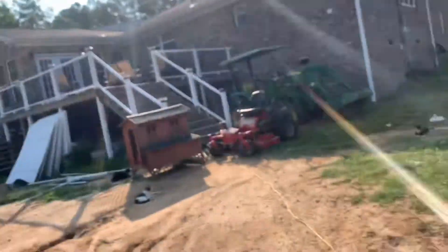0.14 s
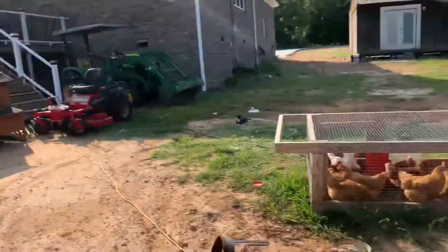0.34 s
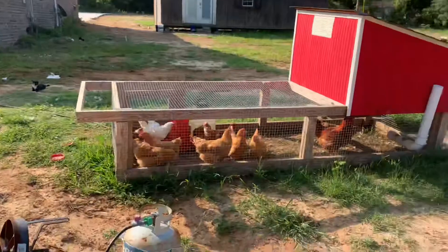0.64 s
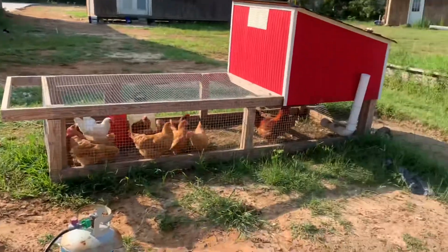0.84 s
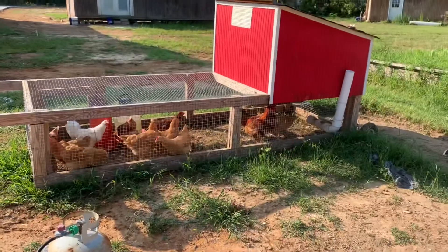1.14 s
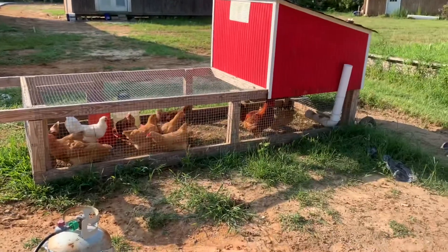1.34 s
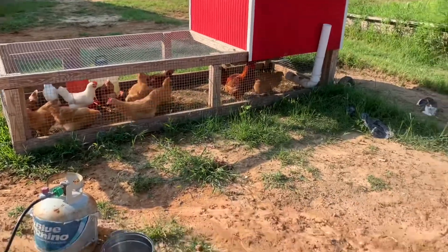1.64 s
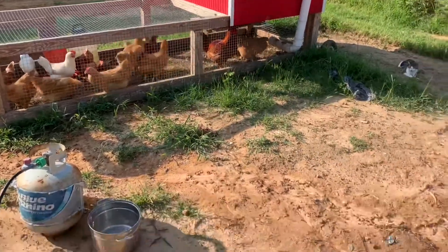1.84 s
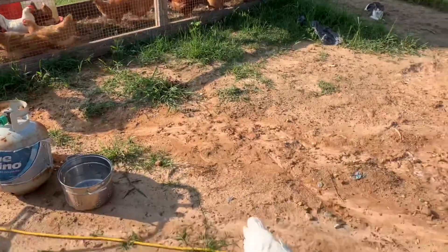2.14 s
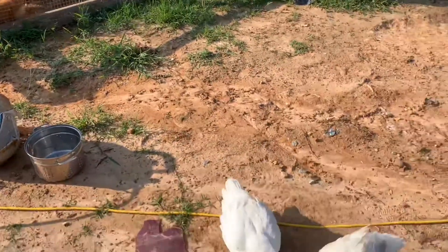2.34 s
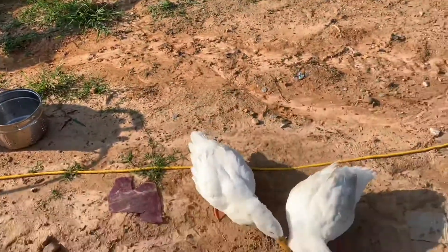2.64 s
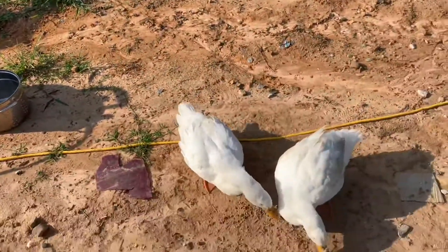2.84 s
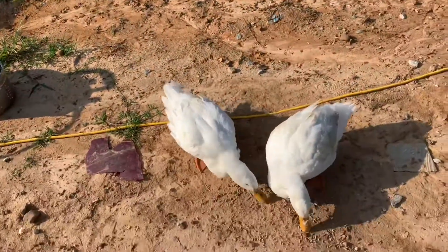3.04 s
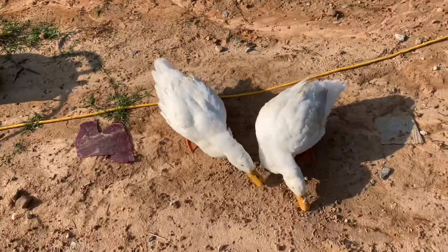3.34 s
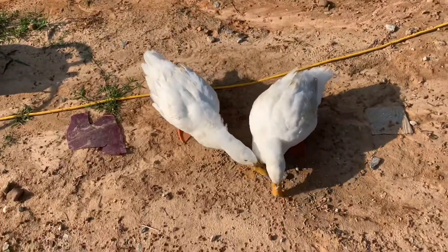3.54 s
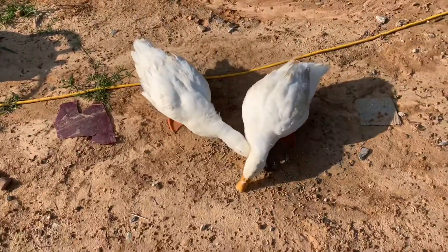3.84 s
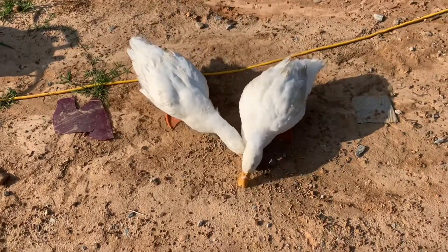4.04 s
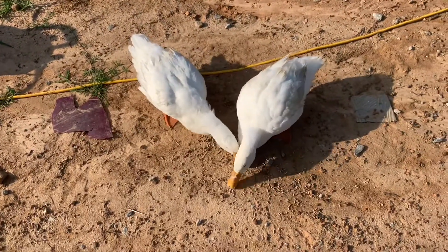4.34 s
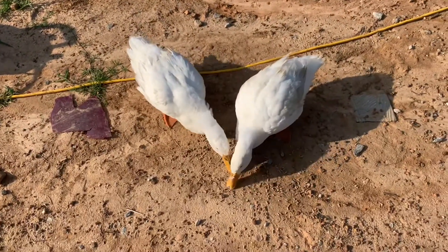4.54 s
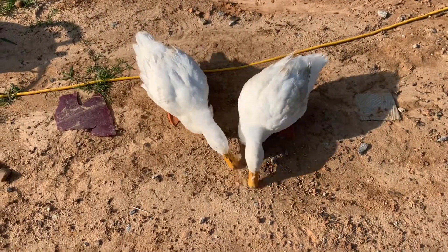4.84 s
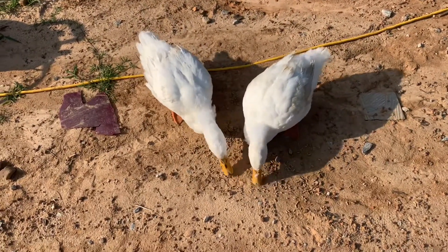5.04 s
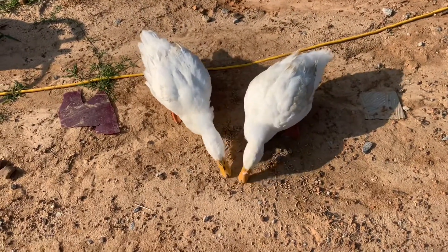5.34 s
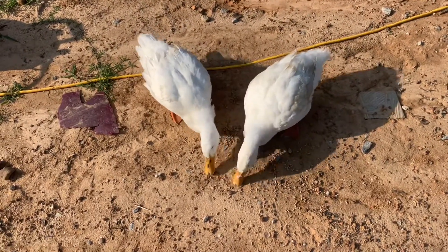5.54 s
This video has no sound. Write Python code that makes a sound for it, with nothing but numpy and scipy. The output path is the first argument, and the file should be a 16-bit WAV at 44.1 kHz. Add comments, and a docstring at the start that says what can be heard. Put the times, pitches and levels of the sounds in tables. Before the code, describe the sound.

Close, clumsy fingers rub and bump the camera body at the start, over a low wavering hum, open air and shrill insects. The yard then settles, with tiny wet-sounding woody ticks of duck bills, light rubs and soft taps. A rough rasp with thuds comes after three seconds, then one deep sharp knock at four and busy nibbling clicks to the end.

```python
"""A farmyard heard through a hand-held camera, under a low hum, rumble, open air, insects and a cricket.
Filtered noise bursts with short bent tones make the ducks' faint bill clicks in the dirt.
Stick-slip jerks over hiss make the rasp of fingers on the camera and the scuff of one shoe.
Taps and deep thumps are single pushes through resonances, with the low notes delayed
so that each blow sweeps down in pitch."""
import sys
import numpy as np
from scipy import signal
from scipy.fft import rfft, irfft, next_fast_len
from scipy.io import wavfile
from scipy.ndimage import uniform_filter1d, map_coordinates

SR = 44100
rng = np.random.default_rng(int(sys.argv[2]) if len(sys.argv) > 2 else 0)


def bounce(signal):
    """Save signal as a 16-bit WAV file at the path given by the first command-line argument."""
    frames = np.transpose(np.atleast_2d(signal))
    limited = np.clip(frames, -1, 1)
    pcm = np.round(limited * 32767).astype(np.int16)
    wavfile.write(sys.argv[1], SR, pcm)


N = 250429

# level of the hum, which the rumble partly follows: (t/s, level/dB)
HUM_LEVEL = [(0, -50), (.4, -48.5), (.9, -51.5), (1.1, -62), (1.75, -55), (1.95, -46.5), (2.2, -45.5),
             (2.45, -50), (2.72, -47.5), (2.85, -59), (3.6, -49.5), (4.9, -52.5), (5.25, -55), (5.68, -54)]
# colour of the yard rumble and of the shaken case: (f/Hz, relative density/dB per Hz)
RUMBLE_COLOUR = [(18, -42.5), (30, -40), (43, 1), (59, 0.5), (73, 8), (87, -4.5), (119, 3.5), (343, -15),
                 (500, -20.5), (650, -40), (1100, -120)]
# side colour of skin rasp, for the second and light grips and the slips: (f/Hz, relative density/dB per Hz)
SKIN_SIDE_COLOUR = [(210, -72), (350, -50), (404, -17.5), (512, -12.5), (584, -18), (723, -2.5), (962, -8),
                    (1210, -8.5), (1410, -19.5), (2080, -18.5), (2430, -22.5), (2900, -21), (6000, -46),
                    (7800, -81), (13200, -120)]


def amp(db):
    """Decibels to linear gain."""
    return 10 ** (np.asarray(db) / 20)


def unit(x):
    """x scaled to rms 1."""
    return x / np.sqrt(np.mean(x ** 2) + 1e-20)


def along(points, hz):
    """Values read between (f/Hz, value) points on a log frequency axis."""
    f, v = np.transpose(points)
    return np.interp(np.log(hz + 1), np.log(f + 1), v)


def curves(rows):
    """One value per sample for each column after the time."""
    s, *cols = np.transpose(rows)
    return [np.interp(np.arange(N) / SR, s, c) for c in cols]


def wobble(rate):
    """A smooth random curve, rate knots a second."""
    knots = rng.standard_normal(int(N * rate / SR) + 4)
    return map_coordinates(knots, [np.arange(N) * rate / SR])


def filtered(x, response):
    """x times a complex response of frequency."""
    n = x.shape[-1]
    m = next_fast_len(n + SR // 4)
    return irfft(rfft(x, m) * response(np.fft.rfftfreq(m, 1 / SR)), m)[..., :n]


def coloured(x, spectrum):
    """x shaped by a spectrum, at rms 1."""
    return unit(filtered(x, lambda hz: amp(along(spectrum, hz))))


def noise(spectrum):
    """Steady noise of a given colour, at rms 1."""
    return coloured(rng.standard_normal(N), spectrum)


def resonance(hz, centre, width):
    """Response of one damped resonance, with gain 1 at its centre."""
    return 1j * hz * width / (centre ** 2 - hz ** 2 + 1j * hz * width)


def stereo(mid, side):
    """Left and right from mid and side."""
    return np.array([mid + side, mid - side])


def add(track, s, sound):
    """Mix a sound in at time s."""
    part = track[..., max(round(s * SR), 0):][..., :sound.shape[-1]]
    part += sound[..., :part.shape[-1]]


def patchy(x, depth_db, hz_size, time_size):
    """x with random patches of gain, so that each band swells and fades on its own."""
    z = signal.stft(x, nperseg=512)[2]
    field = rng.standard_normal(z.shape[-2:])
    field = uniform_filter1d(field, hz_size, 0)
    field = uniform_filter1d(field, time_size, 1)
    gain = unit(amp(depth_db * unit(field)))
    return signal.istft(z * gain, nperseg=512)[1][..., :N]


def dispersion(hz, lag=0.00854, power=0.3427):
    """Low notes arrive late (lag seconds at 100 Hz), so every jerk or blow sweeps downward."""
    return np.exp(-2j * np.pi * lag * 100 * (hz / 100) ** power / power)


def sweep(hz, delay):
    """A rolling fingertip sounds its lower notes later than its top."""
    half_hz = 790  # the delay has halved here
    return np.exp(-2j * np.pi * delay * half_hz * np.arctan(hz / half_hz))


def friction(rate, spread_db, smooth):
    """Stick and slip: random tiny jerks (rate a second) of uneven size over a smooth hiss."""
    slipping = rng.random(N) < rate / SR
    direction = rng.choice([-1, 1], N)
    size = amp(spread_db * rng.standard_normal(N).clip(-2, 2))
    jerks = unit(slipping * direction * size)
    return filtered(jerks + smooth * rng.standard_normal(N), dispersion)


def gesture(s, length, swell_db, attack, t60):
    """Gain of one sliding motion: attack, a hold that swells or sags, release."""
    t = np.arange(N) / SR - s
    onset = np.sin(np.pi / 2 * np.clip(t / attack, 0, 1))
    hold = amp(swell_db * (np.clip(t / length, 0, 1) - 0.5))
    release = np.exp(-np.log(1000) * np.maximum(t - length, 0) / t60)
    return onset * hold * release


def hum(hum_hz=60):
    """A low sine wavers in level and pitch."""
    level_db, = curves(HUM_LEVEL)
    waver_db = 1.2 * wobble(6)
    pitch_hz = hum_hz + 1.15 * wobble(12.0)
    return amp(level_db + waver_db) * np.sin(2 * np.pi * np.cumsum(pitch_hz) / SR)


def rumble(base_db=-52.5, follows_hum=0.25):
    """Low noise drifts in level and partly swells with the hum."""
    hum_db, = curves(HUM_LEVEL)
    swell_db = follows_hum * (hum_db - hum_db.mean())
    return amp(base_db + swell_db + 0.46 * wobble(0.97)) * noise(RUMBLE_COLOUR)


def open_air(base_db=-62, drift_db=-0.96, flutter_db=0.15):
    """Wide soft noise whose bands swell and fade on their own."""
    # colour of the open air, mid then side: (f/Hz, relative density/dB per Hz)
    mid_colour = [(180, 6.5), (300, -3), (389, -9), (432, -5), (760, -7), (900, -9), (1100, -11.5),
                  (1340, -15), (1770, -5), (2380, -22.5), (3310, -14.5), (3860, -11), (5000, -24),
                  (6500, -50.5), (11000, -120)]
    side_colour = [(240, -50.5), (400, -23), (567, -18.5), (723, -10.5), (1020, -1.5), (1380, -6),
                   (1870, -3.5), (2620, -7.5), (4130, -5), (5000, -5.5), (6500, -14), (11000, -120)]
    level_db = base_db + drift_db * wobble(2.1) + flutter_db * wobble(19.0)
    air = amp(level_db) * stereo(noise(mid_colour), amp(-2.0) * noise(side_colour))
    return patchy(air, depth_db=3.0, hz_size=5, time_size=8)


def insect_chorus(mid_db=-66.0, side_db=-63.5, swell_db=0.6):
    """Many far insects merge into a fairly even band of high noise."""
    # colour of the far insects, mid then side: (f/Hz, relative density/dB per Hz)
    mid_colour = [(4000, -38), (5200, -15.5), (6000, 4.5), (6800, 6.5), (7700, 8.5), (8200, -3.5),
                  (8550, 1.5), (9200, -2), (9900, -39), (11500, -12.5), (13200, -13), (14300, -28)]
    side_colour = [(3500, -48), (4700, -15), (6000, -5), (7300, -4), (8200, -4), (8600, -6), (9300, -6),
                   (10500, -26.5), (12000, -39), (14300, -24)]
    pair = stereo(amp(mid_db) * noise(mid_colour), amp(side_db) * noise(side_colour))
    return patchy(amp(swell_db * wobble(5.02)) * pair, depth_db=0.8, hz_size=2, time_size=60)


def whine(whine_hz=8500, level_db=-81):
    """A thin sine of steady level and slightly unsteady pitch sits among the insects."""
    pitch_hz = whine_hz + 18 * wobble(55)
    return amp(level_db) * np.sin(2 * np.pi * np.cumsum(pitch_hz) / SR)


def cricket(stroke_gap_s=0.0148, rest_s=0.007, triple_share=0.28, stroke_s=0.002,
            glide_hz=110, scatter_hz=35, scatter_db=2.3):
    """Wing strokes come in twos and threes with a short rest between; each is a falling whistle."""
    # song of the cricket: (t/s, level/dB, phase between left and right/rad, f/Hz)
    song = [(0, -65.5, 1.16, 7720), (1.6, -59, 1.97, 7690), (2.6, -59.5, 1.9, 7770), (3.2, -69, 0.87, 7810),
            (4.1, -68.5, 0.84, 7800), (4.5, -64.5, .5, 7840), (5.68, -65, 0.55, 7820)]
    db, port_phase, song_hz = curves(song)
    groups = [[stroke_gap_s + rest_s] + [stroke_gap_s] * (1 + int(u < triple_share))
              for u in rng.random(size=240)]
    gaps = np.concatenate(groups)
    late, loud, sharp = rng.standard_normal((len(gaps), 3)).T
    times = np.cumsum(gaps * (1 + 0.035 * late))
    t = np.arange(N) / SR
    nearest = np.searchsorted((times[1:] + times[:-1]) / 2, t)
    u = (t - times[nearest]) / stroke_s  # position within the nearest stroke
    pitch_hz = song_hz + scatter_hz * sharp[nearest] - glide_hz * u.clip(-2, 2) + 60 * wobble(400)
    phase = 2 * np.pi * np.cumsum(pitch_hz) / SR
    strokes = unit(amp(scatter_db * loud[nearest]) * np.exp(-0.5 * u ** 2))
    loudness = amp(db + 0.3 * wobble(5)) * strokes
    return loudness * np.sin(phase + np.array([port_phase, -port_phase]) / 2)


def scuff():
    """A sole slides over dry grit: dense uneven jerks, separate left and right, fading as it slows."""
    # colour of the grit: (f/Hz, relative density/dB per Hz)
    grit_colour = [(180, -49), (300, -10), (382, -5), (414, -2.5), (950, -2.5), (1820, -6.5), (2470, -17),
                   (7360, -22.5), (8920, -25), (9830, -49), (11400, -25), (14000, -42)]
    grit = np.array([coloured(friction(rate=2900, spread_db=15, smooth=1.0), grit_colour)
                     for _ in range(2)])
    return amp(-42.5) * gesture(0.653, length=0.11, swell_db=-8, attack=0.03, t60=0.32) * grit


def ticks(tick_hz=12000, width_hz=1500, t60=0.021):
    """Now and then a tiny, very high tick: narrow-band noise that dies at once."""
    # very high ticks: (t/s, level before decay/dB)
    tick_times = [(1.268, -60), (2.574, -66), (3.873, -70), (4.707, -61)]
    out, t = np.zeros((2, N)), np.arange(SR // 32) / SR
    for s, db in tick_times:
        burst = rng.standard_normal((2, len(t)))
        ring = filtered(burst, lambda hz: resonance(hz, tick_hz, width_hz) ** 2)
        add(out, s, amp(db - 60 * t / t60) * unit(ring))
    return out


def bills(click_t60=0.059, nibble_db=-55.0, nibble_spread_db=3, nibble_s=0.022, overtone_db=-16,
          overtone_spread_db=6.0, tone_share=0.5, tone_rise_s=0.00096, bend_hz_per_s=6000):
    """Bills snap in the dirt, clear clicks among quick faint nibbles, each ringing at the pitch of its gape."""
    # the clearest bill clicks: (t/s, level before the common 8 dB cut/dB, f/Hz)
    clear_clicks = [(1.0138, -42.5, 1790), (1.029, -48, 1740), (1.0812, -39.5, 1790), (1.1136, -52, 1990),
                    (1.1336, -46, 1690), (1.2558, -47, 1720), (1.312, -43, 1870), (1.332, -43.5, 1670),
                    (1.9093, -41.5, 2120), (2.5733, -41.5, 1645), (2.61, -46, 1590), (2.93, -48, 1920),
                    (3.9103, -42, 1640), (3.936, -44.5, 1850), (4.04, -34.5, 1658), (4.057, -45, 1780),
                    (4.3313, -40, 1685), (4.3905, -37.5, 1764), (4.5286, -35.5, 1770), (4.552, -49, 1770),
                    (4.568, -50, 1900), (4.6097, -43, 1710), (4.678, -49, 1750), (4.706, -44.5, 1790),
                    (4.826, -69, 1750), (5.0262, -50, 1800), (5.138, -45, 1700), (5.1554, -39, 1734),
                    (5.157, -49, 2350), (5.159, -44, 1130), (5.171, -42, 1803), (5.1943, -51, 1790),
                    (5.2343, -45.5, 1760), (5.485, -49, 1877), (5.61, -49, 1810)]
    # lower and upper resonance of the bill: (f/Hz, width/Hz)
    lower, upper = [(1800, 290), (3880, 340)]
    # runs of nibbles; a run that ends before it starts is silent: (start/s, end/s)
    runs = [(0.95, 1.6), (3.65, 4.9), (4.378, 3.9), (5.02, 5.54)]
    out, t = np.zeros((2, N)), np.arange(SR // 16) / SR
    beats = np.concatenate([np.arange(start, end, nibble_s) for start, end in runs])
    chances = rng.standard_normal((len(beats), 3))
    nibbles = [(s + nibble_s * late / 2, nibble_db + nibble_spread_db * loud, lower[0] * np.exp(0.074 * sharp))
               for s, (late, loud, sharp) in zip(beats, chances)]
    decay = amp(-60 * t / click_t60)
    for s, db, pitch_hz in list(clear_clicks) + nibbles:
        snap = rng.standard_normal((2, len(t))) * decay
        gape = lower[0] / pitch_hz  # a wider gape rings lower
        overtone = amp(overtone_db + overtone_spread_db * rng.standard_normal())

        def cavity(hz):
            return resonance(hz * gape, *lower) ** 2 + overtone * resonance(hz * gape, *upper) ** 2

        bend = bend_hz_per_s * rng.standard_normal()
        whistle = np.sin(2 * np.pi * (pitch_hz + bend * t / 2) * t)
        tone = whistle * decay * (1 - np.exp(-t / tone_rise_s))
        click = unit(filtered(snap, cavity)) + tone_share * unit(tone)
        add(out, s - 0.001, amp(db - 8.0) * click / np.abs(click).max())
    return out


def slips():
    """A fingertip lets go suddenly, rasps for a moment and sticks again."""
    # brief finger slips: (t/s, level before the common 5.5 dB cut/dB, length scale/s)
    slip_times = [(0.615, -48, 0.014), (3.014, -49, 0.021), (3.048, -40, 0.045), (3.554, -61, 0.013),
                  (3.621, -39.5, 0.015), (4.243, -46, 0.062), (4.278, -47, 0.0081), (4.322, -43.5, 0.019),
                  (4.617, -44, 0.01), (4.839, -46.5, 0.014), (5.347, -43, 0.0086), (5.649, -48.5, 0.0085)]
    # colour of the skin: (f/Hz, relative density/dB per Hz)
    skin = [(150, 8.5), (420, 19), (650, 13.0), (900, 12.5), (1400, -17.5), (2200, -13.0), (4000, -59.0)]
    touch, t = np.zeros(N), np.arange(SR // 8) / SR
    for s, db, length in slip_times:
        rise = 1 - np.exp(-t / 0.0033)
        fall = np.exp(-0.25 * (t / length) ** 2)
        add(touch, s, amp(db - 5.5) * rise * fall)
    mid = coloured(friction(rate=600, spread_db=-3.5, smooth=0.6), skin)
    side = coloured(friction(rate=900, spread_db=-12, smooth=0.48), SKIN_SIDE_COLOUR)
    return touch * stereo(mid, amp(-10.5) * side)


def gap_rings(band_rate=45, waver_hz=14, port_phase=1.0):
    """The rasp rings the air gap under the finger: narrow noise that glides as the gap changes."""
    # rings of the gap: (t/s, length/s, start f/Hz, end f/Hz, left level/dB, right level/dB)
    rings = [(0.005, 0.054, 774, 770, -37, -31), (0.189, 0.06, 960, 906, -32.5, -32),
             (0.277, 0.16, 930, 810, -34, -34), (0.281, 0.12, 731, 710, -44, -37),
             (0.192, 0.052, 1894, 1750, -45.5, -45.5), (0.294, 0.13, 1900, 1822, -52, -43.5),
             (1.57, 0.1, 1420, 1580, -58, -57), (3.225, 0.073, 1545, 1790, -48, -42),
             (3.398, 0.034, 1440, 1460, -40, -32), (3.42, 0.028, 530, 550, -35, -33)]
    out, t = np.zeros((2, N)), np.arange(N) / SR
    band = wobble(band_rate) + 1j * wobble(band_rate)
    waver = waver_hz * wobble(40)
    ports = np.exp(1j * port_phase * np.array([[1], [-1]]))  # opposite phase turns left and right
    for s, length, start_hz, end_hz, left_db, right_db in rings:
        pitch_hz = np.interp(t, [s, s + length], [start_hz, end_hz]) + waver
        phase = 2 * np.pi * np.cumsum(pitch_hz) / SR
        ring = unit((ports * band * np.exp(1j * phase)).real)
        out += amp([[left_db], [right_db]]) * gesture(s, length, 0, attack=0.015, t60=0.06) * ring
    return out


def knocks(rustle_t60=0.097, rustle_db=-24.5, rustle_hard_hz=610, bass_lag_s=0.007696,
           soft_hz=385, hardness_power=0.89):
    """Each blow is one push: a soft fingertip gives a deep thump, a hard tap also rings the case."""
    # finger blows; the row at 0.07 s is the case still ringing after the first tap: (t/s, peak/dB, lowest f/Hz,
    # dead above f/Hz, case ring/dB, sweep delay/s, damping ratio)
    blows = [(0.032, -23, 595, 1400, 2, 0.0032, 0.3), (0.0613, -6.5, 58.6, 5600, -1.5, 0.006, 0.49),
             (0.07, -16.5, 296, 480, 11.5, 0.0018, 0.59), (0.1229, -20, 700, 1400, -3, 0.005, 0.4),
             (0.126, -34, 89, 220, -10, 0.00083, 0.4), (0.153, -29.5, 59, 400, -10, 0, 0.23),
             (.220, -19, 597, 970, 6, 0, 1), (0.612, -47, 520, 1000, 13, 0.0047, 0.39),
             (1.059, -45, 268, 990, 20, 0.0029, .34), (1.433, -33.5, 252, 990, 20, 0.0061, 0.4),
             (1.506, -42, 170, 567, 5, 0, 0.27), (1.798, -30, 258, 1330, -1, 0.0019, 0.72),
             (1.803, -29.5, 202, 269, -13, 0.00042, 0.52), (1.834, -34.5, 202, 845, -1, 0.013, 0.37),
             (1.856, -44, 193, 600, -12, 0.017, 0.38), (1.891, -41, 158, 500, -6, 0.0012, 0.69),
             (1.919, -42, 153, 500, -3, 0.011, 0.68), (3.128, -33.5, 424, 750, -10, .002, .34),
             (3.1972, -18, 157, 1270, 2, 0.0056, 0.4), (3.3, -30, 367, 750, 1, 0.0038, 0.31),
             (3.357, -27, 404, 653, -10, 0.0049, 0.32), (3.384, -32, 360, 756, -2, 0.0047, .34),
             (3.429, -22, 610, 1300, -6, 0.0037, 0.29), (3.465, -23, 85.6, 445, -18, 0.00069, 0.5),
             (4.0172, -4.5, 59.2, 507, -6, 0.0045, .32), (4.1186, -20.5, 63.3, 376, -10, 0.0034, 0.32),
             (4.169, -22.5, 52, 456, -11, 0.0023, 0.39), (4.619, -38.5, 504, 810, -2, 0.0026, 0.28),
             (5.177, -44.5, 486, 791, -17, 0.0064, 0.49), (5.346, -38, 494, 900, 3, 0.0032, 1)]
    # resonances of the case: (f/Hz, width/Hz, left level/dB, right level/dB)
    case = [(407.4, 30.4, 7, 4), (767, 92, 12.5, -22), (1080, 68, -1.5, 7), (1920, 370, 3, 15.5),
            (3410, 210, -34.5, -24.5)]
    # colour of the skin rustle: (f/Hz, relative density/dB per Hz)
    rustle_colour = [(300, -20.5), (700, 18.5), (1800, -2), (2700, -2.5), (3600, -2.5), (6000, -8),
                     (8000, -21.5), (13000, -32)]
    out, push, t = np.zeros((2, N)), signal.unit_impulse(SR // 4), np.arange(SR // 4) / SR

    def modes(hz):
        return sum(amp([[left], [right]]) * (-1) ** k * resonance(hz, centre, width)
                   for k, (centre, width, left, right) in enumerate(case))

    for s, db, low_hz, dead_hz, ring_db, sweep_s, damping in blows:
        # a blow that reaches above a soft fingertip's limit is brighter
        mellow_hz = low_hz * (dead_hz / soft_hz) ** hardness_power

        def contact(hz):
            body = resonance(hz, low_hz, damping * low_hz)
            edge = 1j * hz / (1 + 1j * hz / mellow_hz)
            x = hz / dead_hz
            return body * edge / (1 + 1j * np.sqrt(2) * x - x ** 2) ** 2 / (1 + 1j * x)

        def response(hz):
            late_lows = dispersion(hz, bass_lag_s) * sweep(hz, sweep_s)
            return contact(hz) * late_lows * (1 + amp(ring_db) * modes(hz))

        blow = filtered(push, response)
        add(out, s, amp(db) * blow / np.abs(blow).max())
        # the skin spreads on the case as it lands; softer blows rustle less
        rustle = amp(db + rustle_db - 60 * t / rustle_t60) / (1 + (rustle_hard_hz / dead_hz) ** 3)
        add(out, s, rustle * coloured(rng.standard_normal((2, len(t))), rustle_colour))
    return out


def drag(rasp, rasp_side, side_db, flutter_db, patchy_db, slip_rate, spread_db, smooth):
    """Skin drags over the case in one grip; the pressure flutters and the contact keeps changing colour."""
    mid = coloured(friction(slip_rate, spread_db, smooth), rasp)
    side = coloured(friction(rate=1300, spread_db=8.5, smooth=0.43), rasp_side)
    pair = stereo(mid, amp(side_db) * side)
    return patchy(pair, patchy_db, hz_size=4, time_size=4) * amp(flutter_db * wobble(70))


def fingers(treble_hz=1300, shake_db=-18.5):
    """Every stroke rasps with the colour of its grip and shakes the case a little."""
    # rasp of each grip, mid or side: (f/Hz, relative density/dB per Hz)
    first_rasp = [(88, -43), (150, -22), (244, -2), (354, -20), (403, -3), (555, 0.5), (670, -3.5),
                  (840, 0), (1130, -5.5), (1250, -29), (1370, -13.5), (1640, -26.5), (1850, -14.5),
                  (2060, -27), (2210, -15.5), (2700, -38.5), (3350, -27), (4500, -42.5), (7560, -40),
                  (9820, -64), (12300, -48), (14000, -59)]
    first_side = [(150, -75), (250, -43), (469, -7), (591, -14.5), (744, 0.5), (822, -14.5), (1370, -15.5),
                  (1650, -27), (1880, -16.5), (2180, -31.5), (2790, -28), (7790, -52.5), (10300, -46),
                  (12200, -87.5), (13000, -62.5)]
    second_rasp = [(59, -13.5), (100, -9), (156, -2), (216, -10), (244, -25), (332, -13), (415, 3),
                   (492, 2), (636, -9), (911, -6), (1040, -15), (1720, -16), (2200, -25), (2700, -40.5),
                   (3840, -35), (4500, -41), (5400, -56), (7800, -102), (13200, -120)]
    light_rasp = [(60, -4.5), (120, 7), (200, -3), (270, 2.5), (350, -7.5), (460, 6), (720, -10),
                  (1020, -4.5), (1310, -15.5), (1500, -12), (2300, -20), (2800, -30), (4000, -24.5),
                  (5200, -84)]
    palm_rasp = [(70, -5), (130, 0), (200, 3.5), (290, -10.5), (400, -23), (700, -39), (1500, -48),
                 (3000, -86.5)]
    # the first grip shades left and right differently: (f/Hz, left minus right/dB)
    first_balance = [(450, 0), (650, -5), (850, 4.5), (1000, 4), (1200, -12.5), (1400, 5), (1600, -9.5),
                     (1900, 0.5), (2150, -5), (2700, 5.5), (3400, 0.5)]
    # strokes on the case: (t/s, length/s, level/dB, swell over the stroke/dB, treble/dB, grip)
    strokes = [(-0.015, 0.095, -33.5, -15.5, 8.5, "first"), (0.135, 0.031, -34.5, 3.5, 0, "first"),
               (0.179, 0.057, -28.5, -1, -2, "first"), (0.242, 0.19, -29, 0.5, -2, "first"),
               (0.435, 0.028, -35, -3, -10, "first"), (1.375, 0.33, -55, 3, 0, "palm"),
               (1.817, 0.29, -50.5, -10, 0, "palm"), (3.219, 0.31, -43.5, -2, -2, "palm"),
               (0.505, 0.15, -51, 7.5, -7.5, "light"), (1.427, 0.078, -54.5, -11, 3.5, "light"),
               (1.503, 0.084, -54.5, -1.5, 1.5, "light"), (1.569, 0.13, -51, -1, 2.5, "light"),
               (1.694, 0.094, -66.5, 6, 11, "light"), (1.789, 0.41, -52.5, -10, -3.5, "light"),
               (2.215, 0.065, -48, -6.5, -3, "light"), (2.295, 0.049, -42.5, -1, -1, "light"),
               (2.357, 0.16, -47.5, -3.5, -1.5, "light"), (2.466, 0.028, -41.5, 6.5, -3.5, "second"),
               (2.555, 0.11, -53.5, 6, -1, "light"), (2.998, 0.19, -47.5, -9, 1.5, "second"),
               (3.049, 0.048, -47.5, 4.5, 15, "second"), (3.201, 0.26, -31.5, 7, -1.5, "second"),
               (3.408, 0.03, -47, 3, 9, "second"), (3.474, 0.097, -44.5, -3, -5, "light"),
               (3.609, 0.026, -50, 1.5, 9, "second"), (4.146, 0.023, -46.5, -2, -3.5, "light"),
               (4.186, 0.052, -59.5, 7, -16, "light"), (5.312, 0.018, -58, 9, -17, "light")]
    first = drag(first_rasp, first_side, side_db=-2.5, flutter_db=0.5, patchy_db=1.1,
                 slip_rate=300, spread_db=-1, smooth=1.0)
    second = drag(second_rasp, SKIN_SIDE_COLOUR, side_db=-7.5, flutter_db=-0.5, patchy_db=0.5,
                  slip_rate=420, spread_db=1.0, smooth=0.95)
    light = drag(light_rasp, SKIN_SIDE_COLOUR, side_db=-6, flutter_db=-1.8, patchy_db=2.0,
                 slip_rate=420, spread_db=-1.0, smooth=1.0)
    palm = coloured(friction(rate=120, spread_db=2.5, smooth=0.28), palm_rasp)
    first = filtered(first, lambda hz: amp(np.outer([1, -1], along(first_balance, hz)) / 2))
    grips = {"first": first, "second": second, "light": light, "palm": palm}
    trebles = {grip: filtered(x, lambda hz: 1 - 1 / (1 + (hz / treble_hz) ** 4))
               for grip, x in grips.items()}
    shake = amp(shake_db) * noise(RUMBLE_COLOUR)
    out = np.zeros((2, N))
    for s, length, db, swell_db, treble_db, grip in strokes:
        pressure = amp(db) * gesture(s, length, swell_db, attack=0.032, t60=0.084)
        rasp = grips[grip] + (amp(treble_db) - 1) * trebles[grip]  # a fast stroke is brighter
        out += pressure * (rasp + shake)
    return out


def scene():
    """The yard, its animals and the shoe, with the handling of the camera on top."""
    yard = hum() + rumble() + open_air() + insect_chorus() + whine()
    life = cricket() + scuff() + ticks() + bills()
    handling = slips() + gap_rings() + knocks() + fingers()
    return yard + life + handling


def record(dry, top_hz=14350):
    """A very steep low-pass: hardly anything sounds above about 14 kHz."""
    return filtered(dry, lambda hz: 1 / (1 + (hz / top_hz) ** 80))


dry = scene()
out = record(dry)
bounce(out)
```